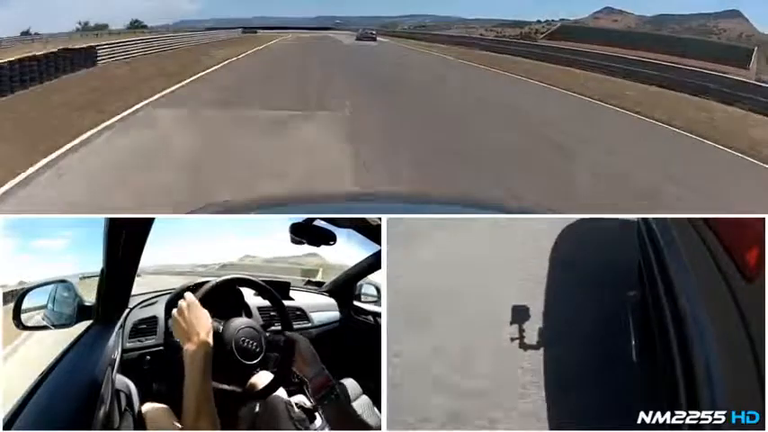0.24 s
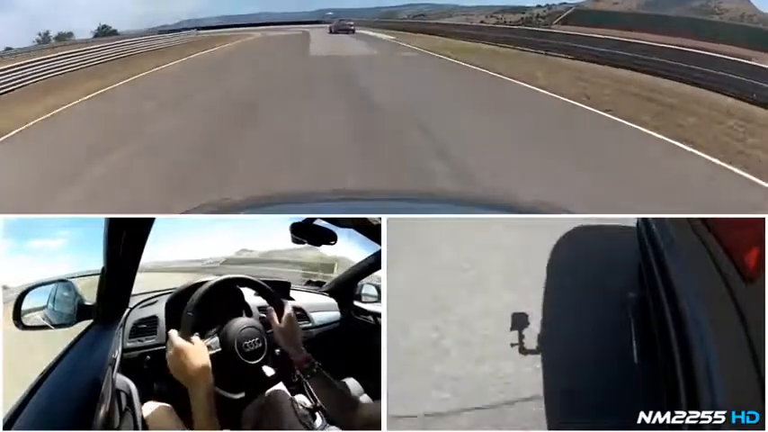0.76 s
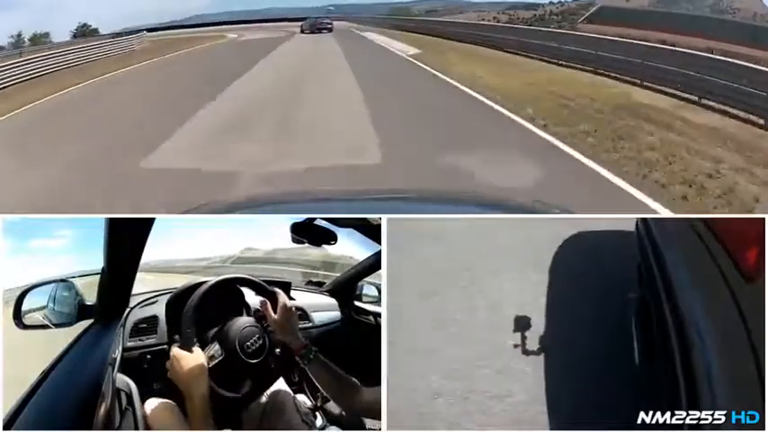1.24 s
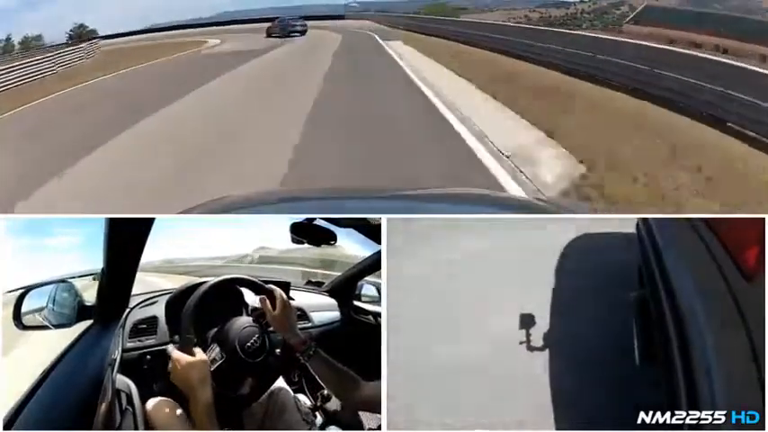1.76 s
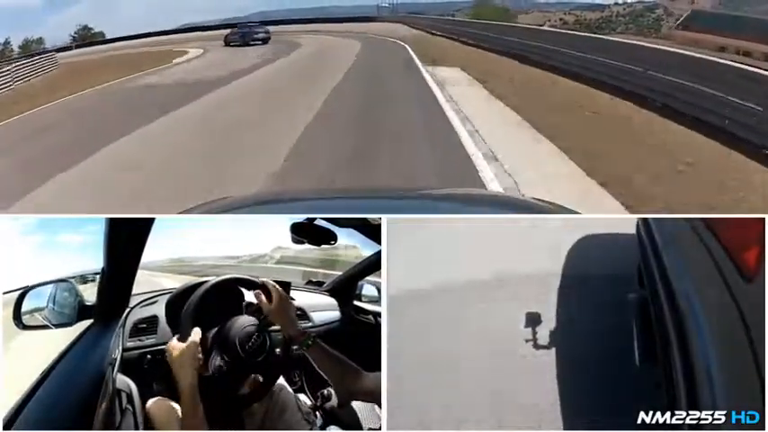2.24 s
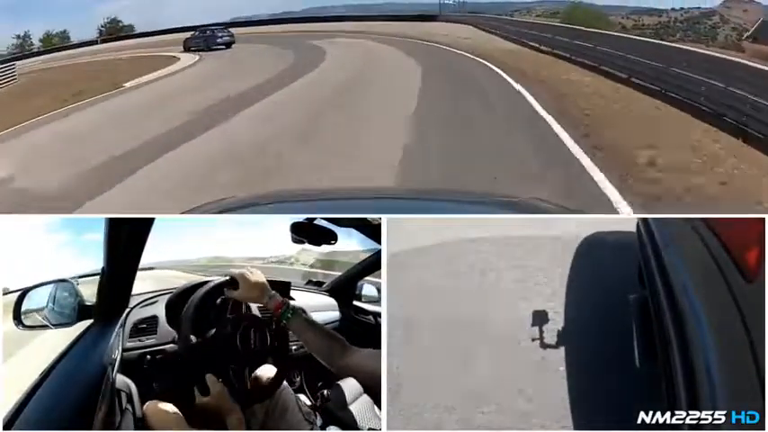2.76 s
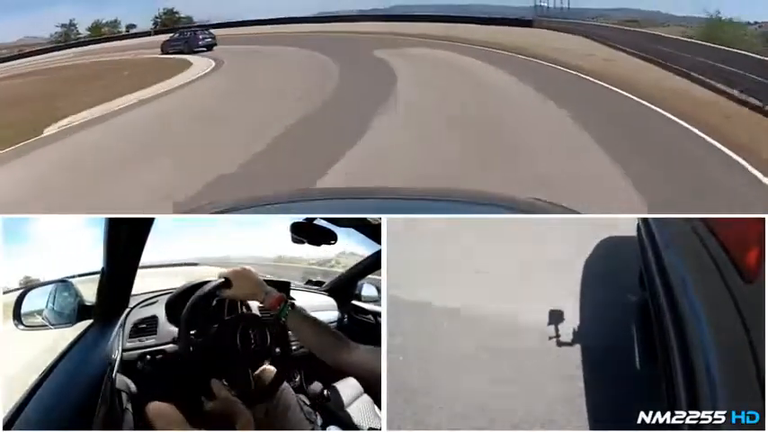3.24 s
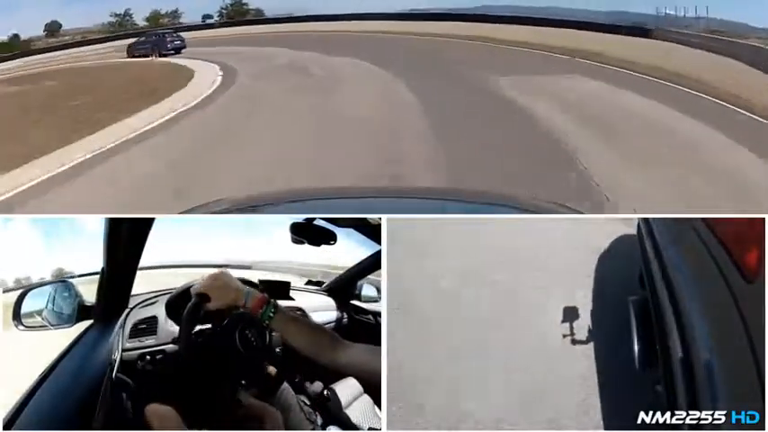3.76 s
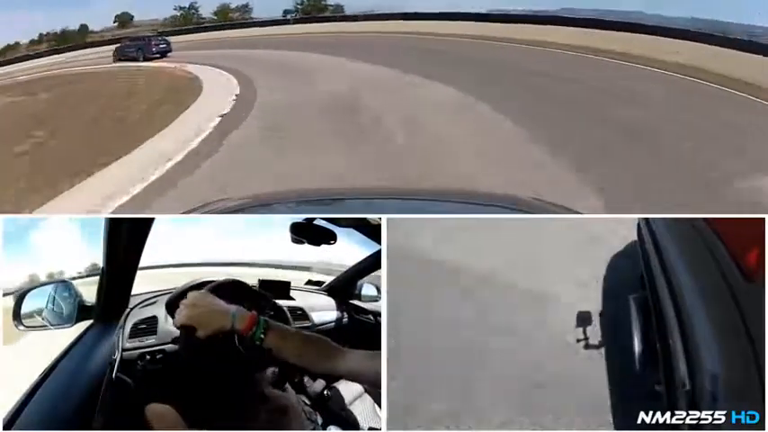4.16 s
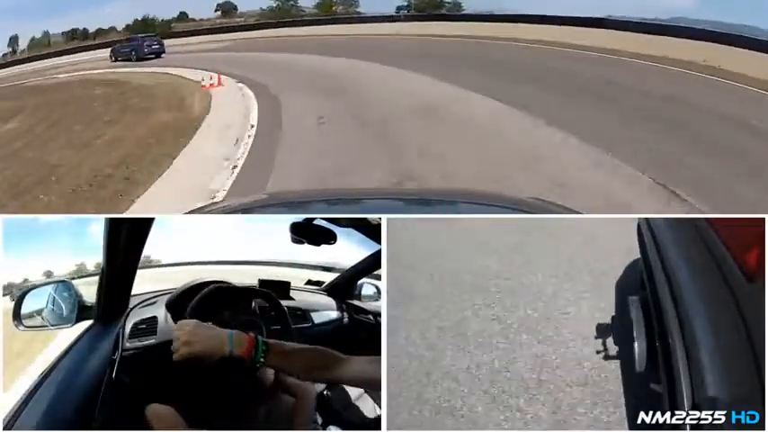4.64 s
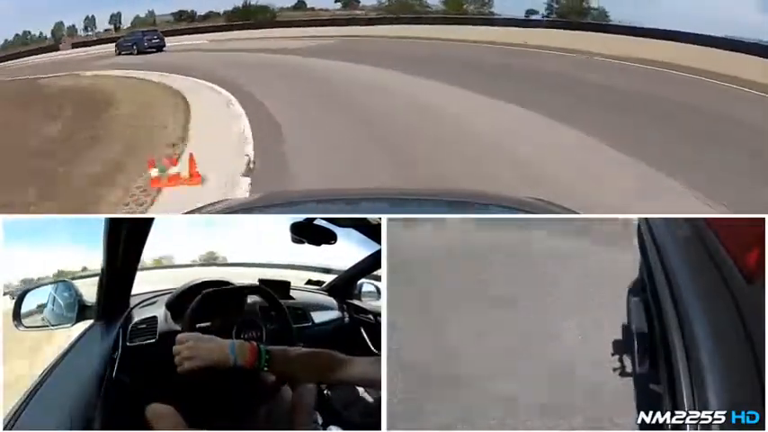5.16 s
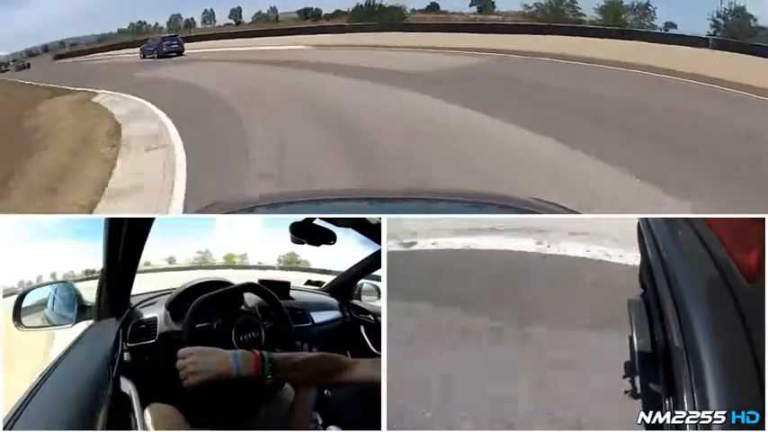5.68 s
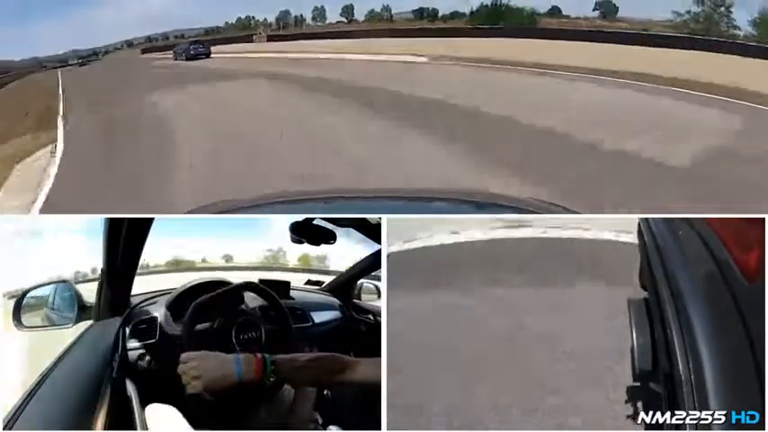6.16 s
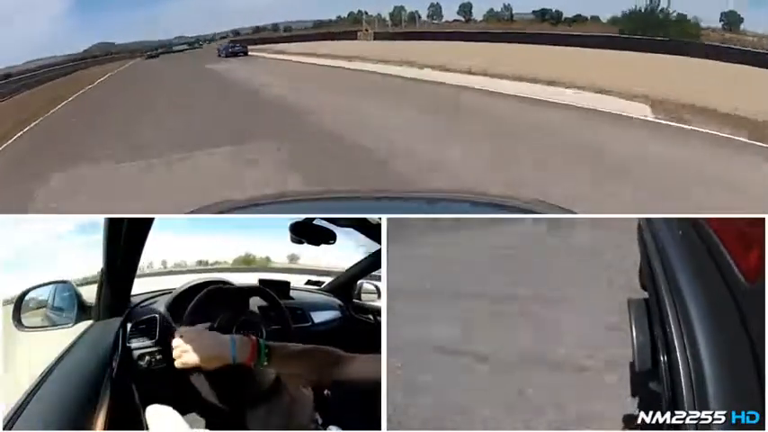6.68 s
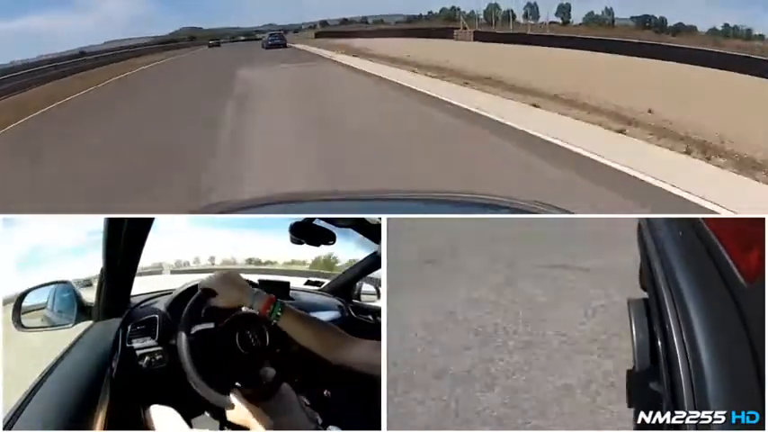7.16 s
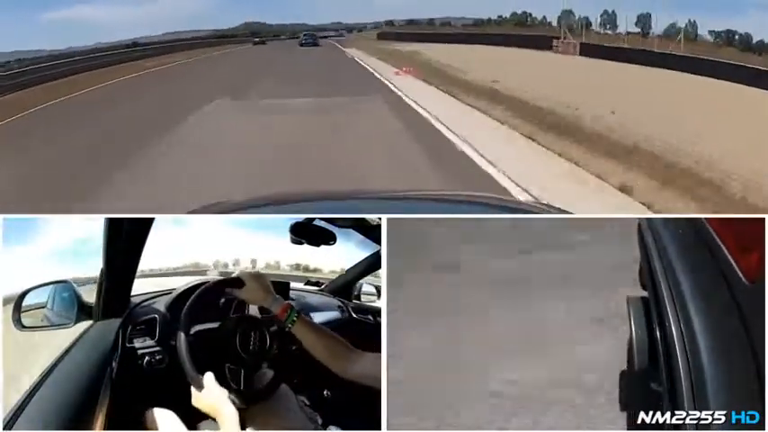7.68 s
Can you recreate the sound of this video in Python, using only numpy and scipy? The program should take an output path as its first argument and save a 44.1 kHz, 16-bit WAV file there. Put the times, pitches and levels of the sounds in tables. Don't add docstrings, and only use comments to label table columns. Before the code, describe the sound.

A turbocharged five-cylinder car howls at full throttle, lifts off, blips and pops through two downshifts, holds a long corner, then roars away again.

```python
import sys
import numpy as np
from scipy import signal
from scipy.fft import rfft, irfft
from scipy.io import wavfile
from scipy.ndimage import uniform_filter1d

SR = 44100
rng = np.random.default_rng(int(sys.argv[2]) if len(sys.argv) > 2 else 0)


def transcribe(signal):
    frames = np.atleast_2d(signal).T
    limited = np.clip(frames, -1, 1)
    pcm = np.round(limited * 32767).astype(np.int16)
    wavfile.write(sys.argv[1], SR, pcm)


def volts(x):
    e = np.asarray(x, float) / 20
    return 10 ** e


N = 349266

# start_s, tyre_db, wind_db
ROAD_LEVELS = [(0, -55, -28.5), (.6, -34, -30), (.85, -40.5, -29), (1.2, -30.5, -23.5), (1.5, -29, -33),
               (1.8, -28.5, -39), (2.2, -28, -33.5), (2.6, -37, -29), (3, -35.5, -29.5), (3.3, -32, -31.5),
               (3.6, -33, -44), (4.2, -34.5, -33.5), (4.6, -33, -38), (4.75, -32, -38), (5.2, -33.5, -35),
               (6, -32, -29.5), (6.4, -32, -30), (7.92, -34, -32)]
# freq_hz, density_db
TYRE_COLOUR = [(60, -9), (100, 6), (200, 5.5), (350, 1), (600, -6.5), (1100, -4.5), (1400, -15.5),
               (1900, -16), (2400, -26), (3100, -19), (3500, -37), (6000, -38.5), (8000, -57),
               (13000, -60.5)]
WIND_COLOUR = [(15, -6), (30, 6.5), (60, -10), (100, -2), (160, -14), (300, -8)]
ROAR_COLOUR = [(60, -24), (150, -6), (300, -10.5), (450, 2), (600, -4), (800, 4), (1050, -4.5),
               (1400, -9.5), (2000, -32)]
RASP_COLOUR = [(1200, 6), (1500, 2), (1700, 6.5), (1950, 1), (2150, -9.5), (2600, -30)]
WHOOSH_COLOUR = [(1900, 4), (2400, 1), (3000, 3.5), (3850, 0.5), (4500, -2.5), (5700, -4.5), (7000, -25),
                 (9000, -29)]
HISS_COLOUR = [(4000, 5), (6000, 2), (8000, 0), (9500, -1.5), (10800, -2.5), (12000, -6), (14000, -9.5),
               (15200, -17.5)]
# freq_hz, width_hz, gain_db
UNDERBODY_MODES = [(708, 17, 6.5), (927, 110, 4)]
PIPE_MODES = [(427, 280, 4), (760, 210, -15), (1040, 200, 4), (1323, 237, -14.5), (1594, 53, 9),
              (2520, 99, 4), (3940, 320, 9.5), (4820, 140, 17.5), (5790, 150, 0), (10780, 340, 7.5)]
BURBLE_MODES = [(720, 36, 7), (933, 20, 7.5)]
FLAP_MODES = [(1960, 94, 6.5)]
HOUSING_MODES = [(1120, 100, 1.5), (1730, 180, 1.5), (2276, 90, 3.5), (2740, 53, 3.5), (2940, 170, 3.5),
                 (3270, 260, -3.5), (4840, 190, -11), (5450, 500, -0.5), (9550, 850, -5.5)]
# start_s, share_0_to_1
PIPE_SHARE = [(0, 0.08), (1.85, 0.5), (1.95, 0.94), (2.7, 0.7), (4.7, 0), (4.78, 1), (6.25, 0.7),
              (6.4, 0.22), (7.65, 0.25)]
# peak_s, level_db, ring_hz (negative for a suck), tip_db
POP_EVENTS = [(0.569, -6, 60.4, -4), (0.619, -9, 72, 2), (0.883, -14, 70, 10), (0.953, -3, 56, 0),
              (0.986, -20, 54, 16), (1.018, -6, -42, -4), (1.07, -15, 57, 12.5), (1.108, -10, 63, -16),
              (1.172, -9, 53, -18), (1.208, -30, 60, 21), (1.527, -16, 49, 11.5), (1.88, -11, -47, 2),
              (2.117, -12, -77, 13), (2.129, -5.5, -61, 6), (2.216, -11, 79, -4), (2.281, -12, 75, -1),
              (2.308, -6, 72, 5.5), (2.323, -9, 61, -3), (2.585, 0, 74, -10), (2.61, -1, 70, -36),
              (2.647, -1, 58, -1), (2.745, -7, 71, 7.5), (2.77, -3.5, 67, -4), (3.054, -21, 72, 10),
              (3.173, -19, 67, 6), (3.542, -11, -48, -12), (4.404, -18, 44, 8), (5.309, -11, 32, -9),
              (5.806, -15, 30, 8.5), (6.094, -10, 66, 5)]
# peak_s, level_db
KNOCKS = [(.567, -31), (.986, -36), (1.015, -40), (2.117, -42), (2.127, -34), (2.586, -32),
          (2.61, -20), (2.649, -25), (2.745, -30), (3.54, -19), (6.095, -32)]
# start_s, firing_hz
FIRING_RATE = [(0, 203.5), (.52, 211.8), (.87, 207.6), (1.2, 198.5), (1.84, 168), (1.98, 192),
               (2.12, 198.5), (2.35, 186), (2.6, 213.5), (2.75, 205.2), (3.2, 168.9), (3.8, 169),
               (4.55, 160.8), (5.4, 162.2), (6.4, 172), (6.9, 181.4), (7.1, 180.9), (7.92, 202.2)]
# start_s, load_db
LOAD_CURVE = [(0, 0), (.57, -1), (.72, -7), (.9, -9), (1, -22), (1.5, -24), (2.2, -32), (3.35, -32),
              (3.52, -20), (4.7, -19), (4.85, -15.5), (5.7, -14.5), (6.1, -13.5), (6.26, -2.5), (6.4, .5),
              (7.3, 1.5), (7.92, 0)]
# start_s, flow_db
FLOW_CURVE = [(0, 1.5), (.58, 2.5), (.69, -17), (1.1, -39), (1.85, -16), (2.2, -20), (3.3, -25.5),
              (3.6, -17), (4.7, -23.5), (4.78, -9.5), (4.9, -7.5), (5.5, -9.5), (6, -4.5), (6.2, 1),
              (6.3, -6.5), (6.7, -2.5), (7.45, -2.5), (7.92, 1)]
# gas_start_s, burn_start_s, fuel_cut_s, load_db, flow_db
DOWNSHIFTS = [
    (1.88, 1.95, 2.137, -8, -.5),
    (2.37, 2.32, 2.574, -1.5, -7.5),
]
# start_s, end_s, firing_db, sag_db_per_s, crank_db
ENGINE_BRAKING = [
    (0.862, 1.9, -26, 12.5, -42),
    (2.157, 2.525, -29, -7, -34),
    (2.62, 3.197, -31, 2, -30.5),
]
# peak_s, level_db, half_length_s
LEVEL_HUSHES = [
    (.76, -1.5, .04),
    (2.17, -5, .018),
    (2.683, -6, .025),
]
# cycle_order, level_db
CRANK_TONES = [(1, -9.5), (2, 0.5), (3, -13), (4, -4.5)]
UNEVEN_TONES = [(11, -5), (12, -1), (13, 1), (14, -8), (16, -5), (18, -5), (20, -3)]
BETWEEN_TONES = [(6, -8.5), (7, -3), (8, 2), (9, -16.5)]

FULL_HZ = 205
FIRING_LAW, DOUBLE_LAW, TRIPLE_LAW = (-18.5, 1, 0), (-23, 1.7, .2), (-36, .85, 0)
CRANK_LAW, UNEVEN_LAW, BETWEEN_LAW = (-35, .9, -.12), (-40, 1.35, -.2), (-43, .7, -.25)
BLIP_DOUBLE_LAW = (-17, .2, 0)
ROAR_LAW, RASP_LAW = (-19.5, 0.86, 0.02), (-33, 1.14, 0.061)
WHOOSH_LAW, HISS_LAW = (-41.5, 1.31, 0.024), (-47.5, 1.0, 0)

SHUT_BELOW_DB, RASP_LEAK_DB, WHOOSH_LEAK_DB = -11.5, -54, -55.5
FLAP_HZ, FLAP_SPAN_HZ = 192.5, 1.5
FLAP_ROAR_DB, FLAP_RASP_DB, FLAP_WHOOSH_DB = 0.5, 3, 4.5
LEAN_ROAR_DB_PER_DB, LEAN_ROUGH_DB_PER_DB = 0.33, .7
POP_T60_S, LONGER_S_PER_DB = .09, .0015
KNOCK_HZ, KNOCK_S = 500, .0048
BLIP_RISE_S, CUT_S, BLIP_DEPTH_DB = .15, .014, 20
GAS_RISE_S, GAS_LENGTH_S, GAS_FALL_S, GAS_DEPTH_DB = .15, .228, .045, 18
OVERRUN_EDGE_S, BURBLE_DB = 0.11, -3
PUMP_DOUBLE_DB, PUMP_BETWEEN_DB = -18, -13
BLIP_TRIPLE_DB, BLIP_ROUGH_DB, BLIP_SWELL_DB = -9, 5.5, 12
AFTER_DB, AFTER_S = -25, .11
DOUBLE_RING_HZ, DOUBLE_WIDTH_HZ, DOUBLE_RING_DB = 395, 25, 4
TRIPLE_RING_HZ, TRIPLE_WIDTH_HZ, TRIPLE_RING_DB = 525, 70, 11
STARVED_BELOW_DB, STARVED_DB_PER_DB = -8, 2.2


def evened(x):
    return x / np.sqrt(np.mean(x ** 2) + 1e-20)


def curves(rows):
    s, *columns = np.transpose(rows)
    return [np.interp(np.arange(N) / SR, s, c) for c in columns]


def ramp(start_s, end_s):
    return np.clip((np.arange(N) / SR - start_s) / max(end_s - start_s, 1 / SR), 0, 1)


def joined(*levels_db):
    return 10 * np.log10(sum(volts(2 * db) for db in levels_db))


def law(rule, drive_db, hz):
    full_db, db_per_db, db_per_hz = rule
    return full_db + db_per_db * drive_db + db_per_hz * (hz - FULL_HZ)


def add(mix, start_s, sound):
    mix[round(start_s * SR):][:len(sound)] += sound


def drift(hz, count):
    steps = rng.standard_normal((count, 4000))
    steps = uniform_filter1d(steps, max(round(500 / hz), 1), axis=1)
    return [np.interp(np.arange(N) / SR, np.arange(4000) / 500, evened(row)) for row in steps]


def coloured(x, modes):
    hz = np.fft.rfftfreq(N, 1 / SR)
    gain_db = sum(db / (1 + (2 * (hz - f) / width) ** 2) for f, width, db in modes)
    return irfft(rfft(x) * volts(gain_db), N)


def noise(colour, patchy_db, flicker_db, size=512):
    frames, hz = 4 * N // size + 5, np.fft.rfftfreq(size, 1 / SR)
    a, b, patches = rng.standard_normal((frames, len(hz), 3)).T
    patches = uniform_filter1d(patches, size=6, axis=0)
    patches = evened(uniform_filter1d(patches, size=12, axis=1))
    flicker = evened(uniform_filter1d(rng.standard_normal(frames), size=4))
    f, db = np.transpose(colour)
    colour_db = np.interp(np.log(hz + 1), np.log(f + 1), db, left=-80, right=-80)
    z = (a + 1j * b) * volts(colour_db[:, None] + patchy_db * patches + flicker_db * flicker)
    return evened(signal.istft(z, nperseg=size, noverlap=3 * size // 4)[1][:N])


def road():
    tyre_db, wind_db = curves(ROAD_LEVELS)
    tyres = coloured(noise(TYRE_COLOUR, patchy_db=1.95, flicker_db=0.67), UNDERBODY_MODES)
    wind = noise(WIND_COLOUR, patchy_db=1.0, flicker_db=-1.5, size=2048)
    return volts(tyre_db) * tyres + volts(wind_db) * wind


def pops():
    out, t = np.zeros(N), np.arange(-900, 6000) / SR
    rise = np.exp(-(t / .008) ** 2)
    tip = np.exp(-(t / .0012) ** 2)
    for s, db, hz, tip_db in POP_EVENTS:
        t60_s = POP_T60_S + LONGER_S_PER_DB * db
        shape = np.where(t < 0, rise, volts(-60 * t / t60_s))
        ring = shape * np.cos(2 * np.pi * abs(hz) * t + 0.48)
        add(out, s + t[0], np.sign(hz) * volts(db - 8.5) * (ring + volts(tip_db) * tip))
    grit = uniform_filter1d(rng.standard_normal((len(KNOCKS), len(t))), size=9)
    for (s, db), sand in zip(KNOCKS, grit):
        knock = np.cos(2 * np.pi * KNOCK_HZ * t) + 0.17 * sand
        add(out, s + t[0], volts(db) * knock * np.exp(-abs(t) / KNOCK_S))
    return out


def driver():
    load_db, flow_db, blip = curves(LOAD_CURVE)[0], curves(FLOW_CURVE)[0], 0
    for gas_s, start, cut, top_db, gas_db in DOWNSHIFTS:
        share = ramp(start, start + BLIP_RISE_S) - ramp(cut, cut + CUT_S)
        blip_db = top_db - BLIP_DEPTH_DB * (1 - share) - 60 * (share <= 0)
        load_db = np.maximum(load_db, blip_db)
        shut = gas_s + GAS_LENGTH_S
        gas_share = ramp(gas_s, gas_s + GAS_RISE_S) - ramp(shut, shut + GAS_FALL_S)
        flow_db = np.maximum(flow_db, gas_db - GAS_DEPTH_DB * (1 - gas_share))
        blip = blip + share
    t = np.arange(N) / SR
    hush_db = sum(db * np.exp(-((t - s) / half) ** 2) for s, db, half in LEVEL_HUSHES)
    pump, crank = 1e-5, 1e-5
    for start, end, db, sag_db, crank_db in ENGINE_BRAKING:
        on = ramp(start - OVERRUN_EDGE_S, start) - ramp(end, end + OVERRUN_EDGE_S)
        pump = pump + on * volts(db - sag_db * (end - start) * ramp(start, end))
        crank = crank + on * volts(crank_db)
    return load_db, flow_db, blip, hush_db, 20 * np.log10(pump), 20 * np.log10(crank)


def cycles():
    tremble = 1 + .002 * drift(hz=12, count=1)[0]
    return np.cumsum(curves(FIRING_RATE)[0] * tremble) / SR / 5


def gas(turn, pedal):
    load_db, flow_db, blip, _, pump_db, _ = pedal
    hz = curves(FIRING_RATE)[0]
    firing, cycle = np.cos(2 * np.pi * 5 * turn), np.cos(2 * np.pi * turn)
    low_puffs = 1 + 0.13 * firing + 0.044 * cycle
    high_puffs = 1 + 0.076 * firing + .08 * cycle
    open_db = np.minimum(flow_db - SHUT_BELOW_DB, 0)
    flap = volts(np.minimum(load_db, 0)) / (1 + np.exp((FLAP_HZ - hz) / FLAP_SPAN_HZ))

    roar_db = law(ROAR_LAW, flow_db, hz) + FLAP_ROAR_DB * flap
    roar_db = roar_db - LEAN_ROAR_DB_PER_DB * load_db * blip + 0.65 * open_db
    churn = noise(ROAR_COLOUR, patchy_db=0.8, flicker_db=1.34)
    burble_db = pump_db + BURBLE_DB + 0.34 * (hz - FULL_HZ)
    burble = volts(burble_db) * coloured(np.roll(churn, SR), BURBLE_MODES)
    roar = volts(roar_db) * churn + burble

    rasp_db = joined(law(RASP_LAW, flow_db, hz) + FLAP_RASP_DB * flap, RASP_LEAK_DB)
    rasp = volts(rasp_db) * noise(RASP_COLOUR, patchy_db=0.0, flicker_db=1.0)
    rasp = rasp + flap * (coloured(rasp, FLAP_MODES) - rasp)

    whoosh_db = joined(law(WHOOSH_LAW, flow_db, hz) + FLAP_WHOOSH_DB * flap, WHOOSH_LEAK_DB)
    whoosh = volts(whoosh_db) * noise(WHOOSH_COLOUR, patchy_db=1.5, flicker_db=0.3)

    hiss_db = law(HISS_LAW, flow_db, hz) + 0.21 * open_db
    hiss = volts(hiss_db) * noise(HISS_COLOUR, patchy_db=1.5, flicker_db=.9)
    dull = coloured(hiss, [(15000, 4600, -6)])
    hiss = dull + volts(open_db) * (hiss - dull)
    return (roar + rasp) * low_puffs + (whoosh + hiss) * high_puffs


def tailpipe(flow):
    share = np.clip(curves(PIPE_SHARE)[0], 0, 1)
    rung = (1 - share) * flow + share * volts(-1.0) * coloured(flow, PIPE_MODES)
    return rung + 0.11 * np.roll(rung, 71) - 0.042 * np.roll(rung, 113)


def tone_levels(pedal):
    load_db, flow_db, blip, _, pump_db, crank_db = pedal
    hz = curves(FIRING_RATE)[0]
    triple_db = TRIPLE_RING_DB / (1 + ((3 * hz - TRIPLE_RING_HZ) / TRIPLE_WIDTH_HZ) ** 2)
    double_db = DOUBLE_RING_DB / (1 + ((2 * hz - DOUBLE_RING_HZ) / DOUBLE_WIDTH_HZ) ** 2)
    swell, after = 0, 0
    for _, start, cut, top_db, _ in DOWNSHIFTS:
        swell = swell + ramp(start, cut) - ramp(cut, cut + CUT_S)
        after = after + volts(top_db) * (ramp(cut, cut + CUT_S) - ramp(cut, cut + AFTER_S))
    swell_db = law(BLIP_DOUBLE_LAW, load_db, hz) - BLIP_SWELL_DB * (1 - swell)
    swell_db = swell_db + 20 * np.log10(abs(blip) + 1e-5)
    after_db = AFTER_DB + 20 * np.log10(abs(after) + 1e-5)
    rough_db = (BLIP_ROUGH_DB - LEAN_ROUGH_DB_PER_DB * load_db) * blip
    starved_db = STARVED_DB_PER_DB * np.minimum(flow_db - load_db - STARVED_BELOW_DB, 0)

    first = joined(law(FIRING_LAW, load_db, hz), pump_db, -45.5)
    second = joined(law(DOUBLE_LAW, load_db, hz) + double_db, swell_db, pump_db + PUMP_DOUBLE_DB, after_db)
    third = law(TRIPLE_LAW, load_db, hz) + triple_db + BLIP_TRIPLE_DB * blip + starved_db
    crank = joined(law(CRANK_LAW, load_db, hz) + rough_db, crank_db)
    uneven = law(UNEVEN_LAW, load_db, hz) + rough_db + starved_db
    between = joined(law(BETWEEN_LAW, load_db, hz) + rough_db, pump_db + PUMP_BETWEEN_DB)
    return first, second, third, crank, uneven, between


def exhaust_note(turn, pedal):
    first, second, third, crank, uneven, between = tone_levels(pedal)
    orders = [(5, first + .6), (10, second + .8), (15, third + .8)]
    orders += [(k, crank + db) for k, db in CRANK_TONES]
    orders += [(k, between + db) for k, db in BETWEEN_TONES]
    cycle_hz = np.gradient(turn) * SR
    for k, db in UNEVEN_TONES:
        chamber_db = 9 / (1 + ((k * cycle_hz - 455) / 55) ** 2)
        orders.append((k, uneven + db + chamber_db))
    level, slip = drift(hz=22, count=len(orders)), drift(hz=15, count=len(orders))
    start = rng.random(len(orders))
    note = np.zeros(N)
    for (k, db), a, b, p in zip(orders, level, slip, start):
        waver_db = (0.56 + .045 * k) * a
        slip_rad = .012 * k * b
        note += np.sqrt(2) * volts(db + waver_db) * np.cos(2 * np.pi * (k * turn + p) + slip_rad)
    return note


def scene():
    turn, pedal = cycles(), driver()
    hush_db = pedal[3]
    rest = road() + pops() + tailpipe(gas(turn, pedal))
    return (volts(hush_db) * rest + volts(0.79 * hush_db) * exhaust_note(turn, pedal))[None]


def band_limit(x):
    return signal.sosfilt(signal.butter(12, 15170, fs=SR, output="sos"), x)


def record(dry):
    housed = coloured(dry, HOUSING_MODES)
    heard = signal.lfilter(*signal.butter(1, 18, "high", fs=SR), housed)
    rounded = 1.1 * np.tanh(heard / 1.145)
    return band_limit(rounded)


dry = scene()
out = record(dry)
transcribe(out)
```